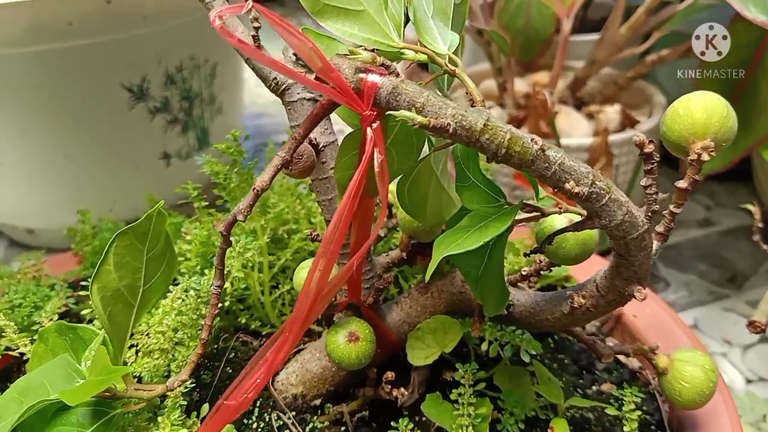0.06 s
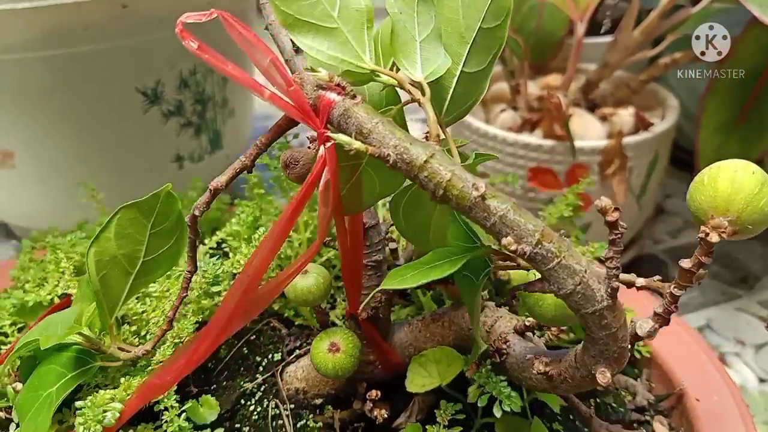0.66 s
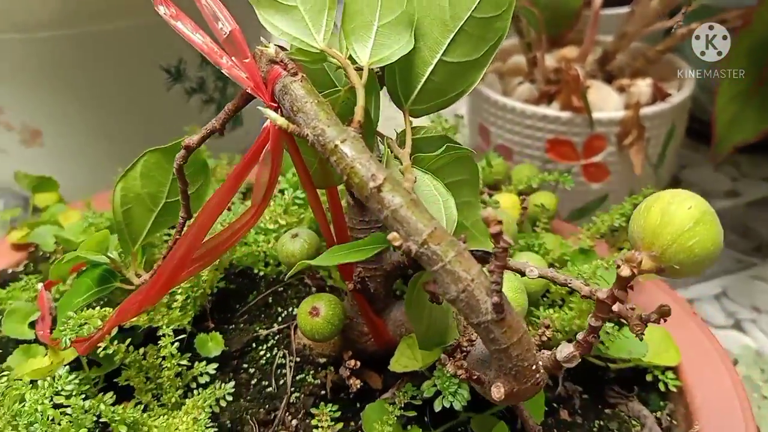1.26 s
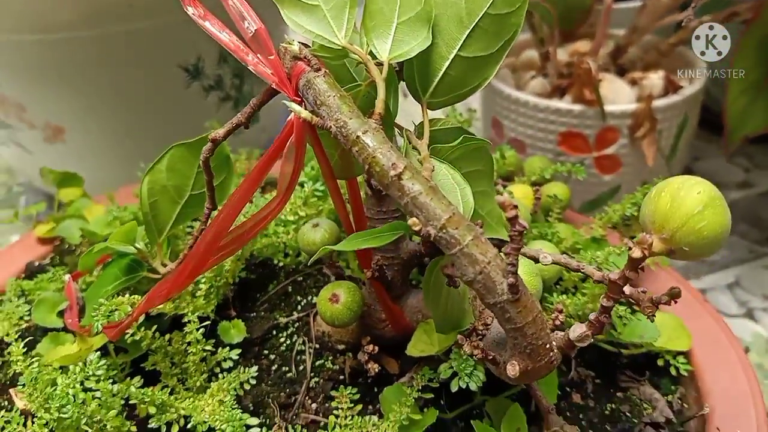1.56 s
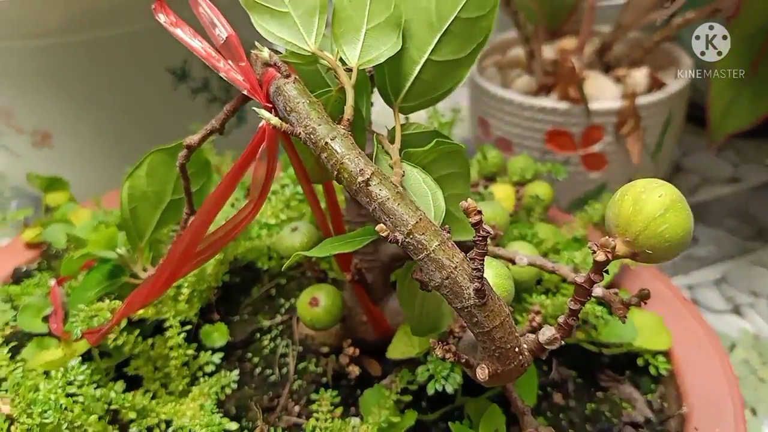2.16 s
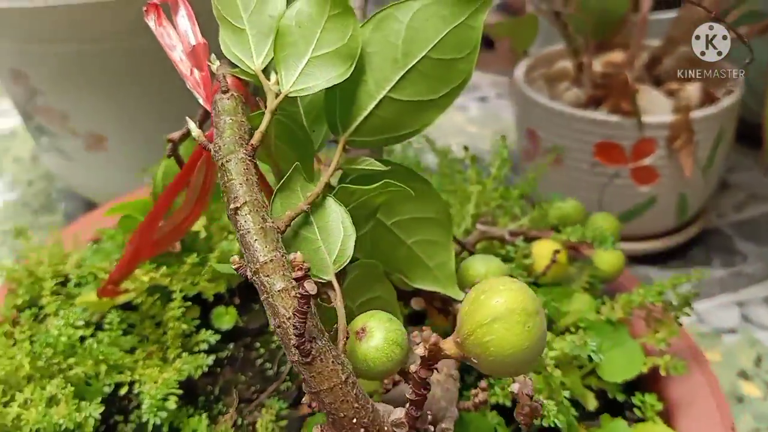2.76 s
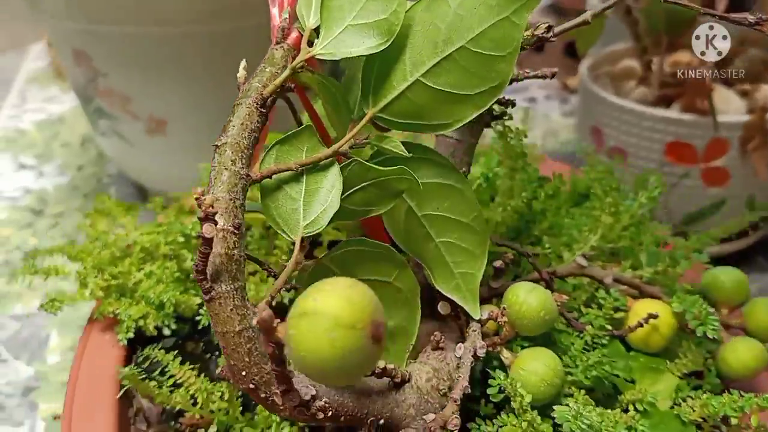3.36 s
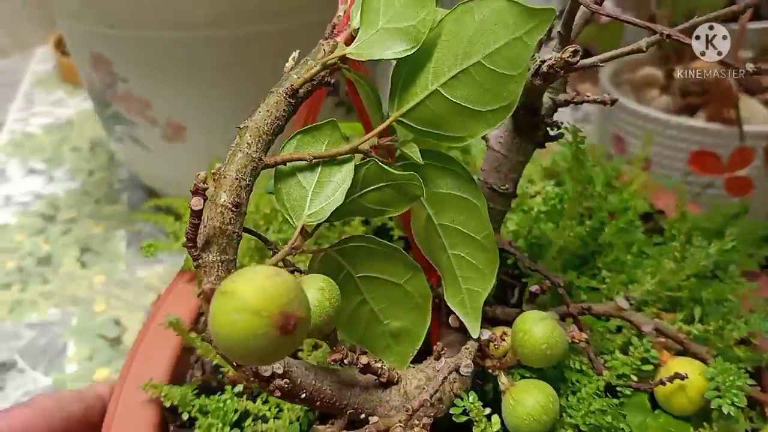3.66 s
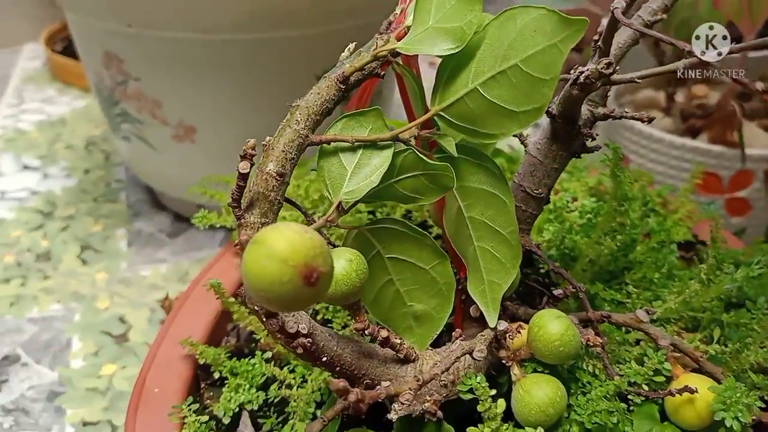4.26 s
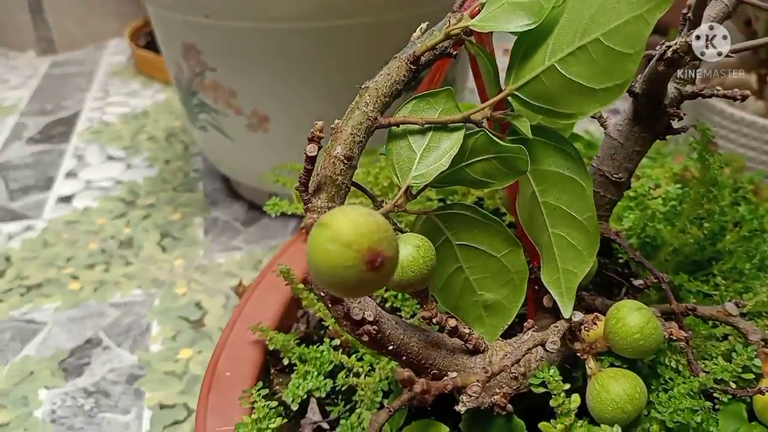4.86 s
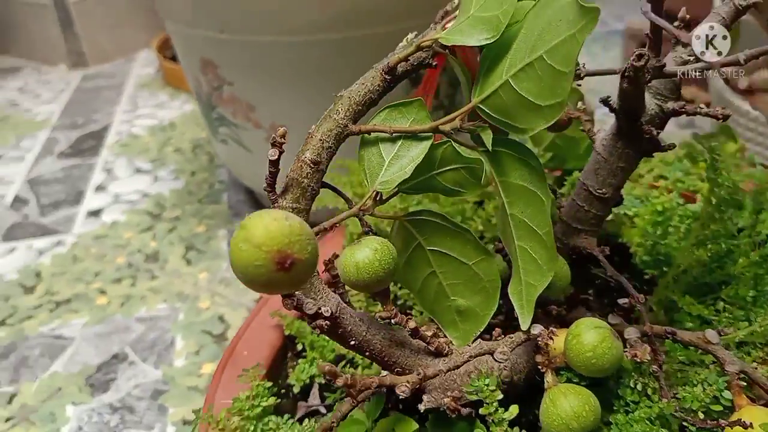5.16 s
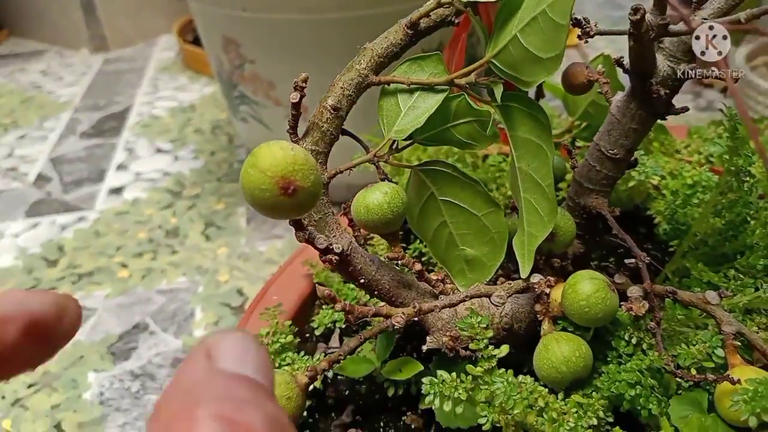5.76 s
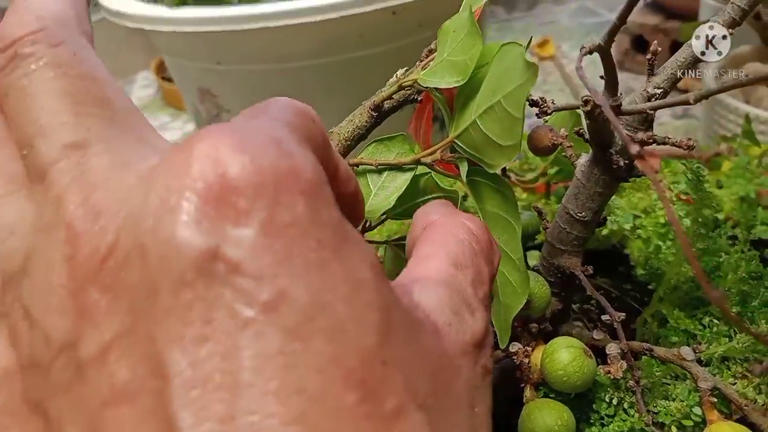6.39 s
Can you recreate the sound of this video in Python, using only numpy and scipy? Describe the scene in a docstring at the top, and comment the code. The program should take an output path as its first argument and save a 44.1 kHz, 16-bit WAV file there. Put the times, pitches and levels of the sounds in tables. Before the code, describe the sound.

Close, gritty scraping of a plant pot turned in several pushes, juddering into tiny squeaks and knocking lightly over a quiet background.

```python
"""A plastic pot with a small fig tree is turned on a table in a few pushes, close to a phone.
First its base hisses over fine grit and single grains crack; at 2 s the pot rocks and knocks.
From 2.5 s trapped grains judder into short rough squeaks that dip in pitch and recover.
From 4 s a dove coos far off and the pot knocks again; a last push squeaks at 5.3 s.
At 6.4 s a hand takes hold of a branch and jolts the pot. A quiet background murmurs throughout."""
import sys
import numpy as np
from scipy import signal
from scipy.fft import rfft, irfft, next_fast_len
from scipy.io import wavfile

SR = 44100
rng = np.random.default_rng(int(sys.argv[2]) if len(sys.argv) > 2 else 0)


def to_wav(s):
    """Save 16-bit WAV."""
    ch = np.atleast_2d(s).T  # columns
    pcm = np.round(np.clip(ch, -1, 1) * 32767)  # PCM
    wavfile.write(sys.argv[1], SR, pcm.astype(np.int16))


N = 287990
TIME = np.arange(N) / SR
TOP_HZ = 15600

# wall response to fine scraping: f/Hz, gain/dB
SCRAPE_EQ = [(500, -20.5), (1100, -12), (1500, -3), (1900, 3.5), (2200, 2), (2550, 1), (3300, -9.5),
             (4400, -8.5), (5500, -3.5), (6500, -11.5), (8500, -29.5), (15000, -34)]
# grains catching under the rim: t/s, length/s, pitch at bottom of dip/Hz, relative level/dB
CATCHES = [(2.5352, 0.0092, 1183, -28.5), (2.561, 0.01, 2205, -29), (2.572, 0.0071, 2173, -30),
           (2.592, 0.0052, 2455, -39), (2.63, 0.0064, 2270, -27.5), (2.6446, 0.0072, 2800, -30.5),
           (2.6768, 0.0053, 2315, -27.5), (2.695, 0.011, 2710, -33.5), (2.705, 0.007, 1335, -31.5),
           (2.7145, 0.011, 1735, -27.5), (2.727, 0.005, 2140, -29), (2.734, 0.0089, 1742, -27.5),
           (2.743, 0.013, 1895, -32), (2.786, 0.0088, 2800, -30.5), (2.793, 0.012, 1900, -29.5),
           (2.808, 0.0066, 2480, -28), (2.816, 0.0089, 2105, -27), (2.829, .004, 2600, -29.5),
           (2.8385, .016, 1794, -27.5), (2.855, 0.0062, 1946, -28), (2.864, 0.0063, 2255, -27.5),
           (2.875, 0.0068, 2680, -29.5), (2.897, .0045, 2160, -26), (2.904, 0.004, 2620, -28.5),
           (2.9115, 0.0045, 2500, -28), (2.9177, 0.006, 2190, -26), (2.924, 0.011, 1714, -28.5),
           (2.9525, 0.0052, 1810, -31), (2.958, 0.0091, 2050, -28), (3.031, .012, 1192, -30),
           (3.0736, 0.0064, 2360, -30.5), (3.835, 0.0099, 993, -27.5), (3.846, 0.0077, 2575, -30.5),
           (3.8698, .008, 1197, -29.5), (3.875, 0.0093, 1986, -26.5), (3.882, 0.011, 2214, -31.5),
           (5.262, 0.023, 580, -23), (5.285, 0.012, 1658, -25), (5.298, 0.0096, 1393, -26.5),
           (5.307, 0.0073, 2275, -20.3), (5.312, 0.016, 1793, -22), (5.365, .012, 948, -26.5),
           (5.375, 0.0077, 1850, -23), (5.381, .008, 1197, -25.5), (5.387, 0.0046, 2250, -29.5)]


def undb(db):
    """Decibels to gain."""
    return 10 ** (np.asarray(db) / 20)


def unit(x):
    """Scale to rms 1."""
    return x / np.sqrt(np.mean(x ** 2) + 1e-20)


def along(points, hz):
    """Read (f/Hz, value) points on a log-frequency axis."""
    f, value = np.transpose(points)
    return np.interp(np.log(hz + 1e-3), np.log(f), value)


def colour(x, points):
    """Minimum-phase filter through (f/Hz, gain/dB) points."""
    size = next_fast_len(x.shape[-1] + 1024, real=True)
    size += size % 2
    cepstrum = irfft(np.log(undb(along(points, np.fft.rfftfreq(size, 1 / SR)))))
    cepstrum[1:size // 2] *= 2
    cepstrum[size // 2 + 1:] = 0
    return irfft(rfft(x, size) * np.exp(rfft(cepstrum)))[..., :x.shape[-1]]


def resonate(x, hz, width_hz):
    """One resonance, gain 1 at its centre."""
    return signal.lfilter(*signal.iirpeak(hz, hz / width_hz, fs=SR), x)


def walk(rate_hz, size=N):
    """Random line segments, rms near 1."""
    at = np.arange(size) * rate_hz / SR
    knots = rng.standard_normal(int(at[-1]) + 2)
    return np.interp(at, np.arange(len(knots)), knots) * np.sqrt(3 / 2)


def add(out, x, start_s):
    """Mix in a stereo sound."""
    i = max(int(start_s * SR), 0)
    out[:, i:i + x.shape[1]] += x[:, :max(N - i, 0)]


def spread(pair):
    """Two unrelated signals become left and right: alike in the bass, apart in the treble."""
    # likeness of the two microphone ports: f/Hz, coherence/1
    coherence = [(100, 0.94), (300, 0.78), (700, 0.77), (1400, 0.13), (3000, 0), (6000, 0)]
    alike = along(coherence, np.fft.rfftfreq(N, 1 / SR))
    mid, side = irfft(rfft(pair) * np.sqrt([1 + alike, 1 - alike]), N)
    return np.array([mid + side, mid - side]) / 2


def ports(pair):
    """Each microphone port hears its own colour; the left one faces the pot."""
    # port balance: f/Hz, left minus right/dB
    balance = [(400, 3), (700, 0), (1300, 5), (2400, 7), (3400, -2), (4400, -3.5), (5600, 3), (8000, 1.5),
               (13000, 7.5)]
    return np.array([colour(x, [(hz, sign * db / 2) for hz, db in balance])
                     for x, sign in zip(pair, (1, -1))])


def slide(dust_gain_db=6.5, flutter_db=1.0):
    """The base slides: grit and dust excite the wall, the pot's weight drags below them."""
    # heavy, soil-filled body: f/Hz, gain/dB
    drag_eq = [(150, -32.5), (380, -15.5), (500, -1.5), (650, 1), (800, 1), (1000, 3.5), (1400, -4.5),
               (2200, -33)]
    # finest dust: f/Hz, gain/dB
    dust_eq = [(3000, -39.5), (5500, 18.5), (7000, 9), (9500, 1), (11500, 3), (13500, 3), (15500, -4.5)]
    hiss_env, drag_env, dust_env = friction()
    grit = rim_resonance(wall_ring(colour(grains(rate_hz=2500, scatter_db=1.0), SCRAPE_EQ)))
    drag = wall_ring(colour(grains(rate_hz=1500, scatter_db=.5), drag_eq))
    dust = colour(grains(rate_hz=5000, scatter_db=1.5), dust_eq)
    rub = hiss_env * unit(ports(grit)) + drag_env * unit(ports(drag))
    rub += undb(dust_gain_db) * dust_env * unit(ports(dust))
    return rub * undb(flutter_db * walk(90))


def grains(rate_hz, scatter_db):
    """Dense tiny slips of uneven size over a smooth rub."""
    hits = rng.random(N) < rate_hz / SR
    slips = hits * undb(scatter_db * np.minimum(rng.exponential(size=N), 5))
    return spread(rng.standard_normal((2, N)) * (unit(slips) + 1))


def friction(loose_grit_db=-13, loose_dust_db=-29):
    """Hiss, drag and dust envelopes: pushes, brief swells and what the judders shake loose."""
    # turning pushes: t/s, length/s, rise/s, fall/s, hiss/dB, swell/dB,
    # drag re hiss/dB, dust re hiss/dB, creep/dB
    pushes = [(-0.05, 1.482, .04, 0.03, -51, 4, -7.5, -20.5, -32),
              (0.334, 0.76, 0.067, 0.12, -52.5, 3.5, -6, -19, -25),
              (1.137, 0.29, 0.092, 0.039, -51.5, 1.5, -5, -20.5, -36),
              (2.299, 0.86, 0.15, 0.078, -46, -0.5, -8, -21, -20.5),
              (3.063, 0.9, 0.094, 0.043, -46.5, 1, -11.5, -16, -24),
              (3.236, 0.7, 0.1, 0.045, -49, -3, -0.5, -29, -13.5),
              (3.864, 0.16, 0.023, 0.023, -41.5, 0.5, -12, -21.5, -19),
              (4.203, 0.39, 0.1, 0.16, -56.5, 8.5, -28, -18.5, -11),
              (5.025, 0.5, 0.071, 0.06, -51.5, 11, -11.5, -21, -10)]
    # brief swells, including short tails after squeaks: centre t/s, half width/s, hiss/dB, dust/dB
    swells = [(.125, 0.031, -53, -57), (.21, 0.062, -53.5, -75), (.53, 0.013, -47.5, -61),
              (.75, 0.034, -52, -73), (3.9, 0.0055, -43, -58), (3.957, 0.0032, -55, -52),
              (5.332, 0.0027, -39, -74)]
    power = np.zeros((3, N))
    for start_s, length_s, rise_s, fall_s, db, swell_db, drag_db, dust_db, creep_db in pushes:
        envelope = push(start_s, length_s, rise_s, fall_s, swell_db, creep_db)
        power += np.outer(undb([db, db + drag_db, db + dust_db]), envelope) ** 2
    hiss, drag, dust = np.sqrt(power)
    swell_hiss, swell_dust = sum(np.outer(undb(levels_db), np.exp(-((TIME - at_s) / width_s) ** 2 / 2))
                                 for at_s, width_s, *levels_db in swells)
    shake = shaken()
    hiss = np.hypot(hiss, undb(loose_grit_db) * shake + swell_hiss)
    dust = np.hypot(dust, undb(loose_dust_db) * shake + swell_dust)
    return hiss, drag, dust


def push(start_s, length_s, rise_s, fall_s, swell_db, creep_db, creep_s=.15):
    """One push rises, swells towards its middle and falls into a short creep."""
    age_s = TIME - start_s
    left_s = length_s - age_s
    creep = undb(creep_db) * np.exp(np.minimum(left_s, 0) / creep_s)
    arch = np.sin(np.pi * np.clip(age_s / length_s, 0, 1))
    return np.clip(age_s / rise_s, 0, 1) * np.clip(left_s / fall_s, creep, 1) * undb(swell_db * arch)


def shaken(settle_s=.043):
    """Each judder keeps the grit shaken up for a moment."""
    drive = sum(undb(db) * ((TIME >= start_s) & (TIME < start_s + length_s))
                for start_s, length_s, _, db in CATCHES)
    pole = np.exp(-1 / (settle_s * SR))
    return signal.lfilter([1 - pole], [1, -pole], drive)


def wall_ring(x):
    """Wall resonances lift narrow bands of the scraping."""
    # wall modes: f/Hz, width/Hz, gain/dB
    modes = [(640, 38, -2), (2030, 120, -11.5), (2360, 86, -7.5), (2750, 210, -5), (5300, 150, -18)]
    return x + sum(undb(db) * resonate(x, hz, width_hz) for hz, width_hz, db in modes)


def rim_resonance(x, width_hz=130):
    """A narrow resonance glides and swells as the contact moves round the pot."""
    # resonance path: t/s, f/Hz, gain/dB
    glide = [(0, 2370, 1), (.55, 2480, 0.5), (.8, 2360, -8.5), (1.05, 1890, -4.5), (1.36, 2000, -3),
             (1.43, 2050, -14), (2.399, 2280, -4), (3.5, 2140, -18.5), (3.9, 1980, -0.5), (4.0, 2440, 5),
             (4.4, 2150, -22), (5.15, 1920, -3), (5.45, 2200, 5)]
    at_s, hz, db = np.transpose(glide)
    carrier = np.exp(2j * np.pi * np.cumsum(np.interp(TIME, at_s, hz)) / SR)
    pole = np.exp(-np.pi * width_hz / SR)
    baseband = signal.lfilter([1 - pole], [1, -pole], x * carrier.conj())
    return x + 2 * np.real(carrier * baseband) * undb(np.interp(TIME, at_s, db))


def squeaks(gain_db=-2.5, ring_db=3, ring_width_hz=450, steady_s=.009):
    """Each catch sounds from its place on the rim, where the wall adds a thin high ring."""
    # travelling catch spot: t/s, left lead at 2 kHz/rad, left minus right/dB, unloaded slip rate/Hz,
    # upper range/dB, edge band/dB, ring/Hz
    spot = [(2.55, -0.89, 1, 3250, -3.5, -1, 5870), (3.05, -0.56, 1, 3090, -9.5, 3, 5960),
            (3.85, -1.02, 1, 2920, -9, 3.5, 5400), (5.3, 1.53, 3, 2500, -11.5, -9.5, 5580)]
    # squeak roughness: t/s, relative slip rate jitter/1, rasp/1
    roughness = [(2.55, .1, .5), (3.85, .11, .6), (5.3, .06, .36)]
    # band radiated unevenly round the rim: foot/Hz, centre/Hz, top/Hz
    edge_hz = (1980, 3000, 3850)
    out = np.zeros((2, N))
    spot_s, *spot_columns = np.transpose(spot)
    rough_s, *rough_columns = np.transpose(roughness)
    for start_s, length_s, low_hz, db in CATCHES:
        lead_rad, pan_db, free_hz, upper_db, edge_db, ring_hz = (
            np.interp(start_s, spot_s, column) for column in spot_columns)
        jitter, rasp = (np.interp(start_s, rough_s, column) for column in rough_columns)
        jitter *= min(length_s / steady_s, 1)  # short squeaks are steadier
        force = stick_slip(length_s, low_hz, free_hz, lead_rad, jitter, rasp)
        sound = colour(radiate(force, upper_db), list(zip(edge_hz, (0, edge_db, 0))))
        rung = sound + undb(ring_db) * resonate(sound, ring_hz, ring_width_hz)
        gains = undb(db + gain_db + pan_db * np.array([[.5], [-.5]]))
        add(out, gains * unit(rung) * np.std(sound), start_s)
    return out


def stick_slip(length_s, low_hz, free_hz, lead_rad, jitter, rasp, attack_s=.00039, release_s=.001998):
    """A grain loads up and lets go: the slip rate dips and recovers, with a rasp on every slip."""
    total_s = length_s + release_s / 2
    size = max(int(total_s * SR), 64)
    t = TIME[:size]
    load = np.sin(np.pi * ((np.arange(size) + .5) / size) ** .75)  # peaks early
    hz = free_hz * (low_hz / free_hz) ** (load ** .55) * np.exp(jitter * walk(1500, size))
    phase = 2 * np.pi * np.cumsum(hz) / SR
    k = np.arange(1, 13)[:, None]
    partials = undb(-6 * np.log2(k)) * (k * hz < TOP_HZ)
    # bending waves in the wall scatter the partials and reach the two ports out of step
    scatter_rad = 2 * np.pi * rng.random(k.shape)
    slips = np.array([np.sum(partials * np.sin(k * (phase - lag_rad * hz / 2000) + scatter_rad), axis=0)
                      for lag_rad in (0, lead_rad)])
    noise = rng.standard_normal((2, size)) * (1 + .31 * np.cos(phase))
    contact = np.clip(np.minimum(t / attack_s, (total_s - t) / release_s), 0, 1)
    swell = 1 + .45 * load ** 2
    return (unit(slips) + 2 * rasp * unit(noise)) * contact * swell * undb(.52 * walk(694, size))


def radiate(force, upper_db, split_hz=3180):
    """The wall radiates a judder; upper_db sets how bright the squeak sounds."""
    # wall response to a judder: f/Hz, gain/dB
    judder_eq = [(250, -38), (550, -17), (1000, -8.5), (1400, -8), (1900, 2.5), (2600, 5), (3100, -1),
                 (3700, -2.5), (4400, -2), (5300, 1.5), (6100, -4), (7000, -11), (9000, -22),
                 (12500, -16.5), (15500, -27)]
    sound = ports(colour(np.pad(force, ((0, 0), (0, 400))), judder_eq))
    lower, upper = (unit(signal.sosfiltfilt(signal.butter(4, split_hz, side, fs=SR, output="sos"), sound))
                    for side in ("low", "high"))
    return (lower + undb(upper_db) * upper) * np.sqrt(force.shape[1] / sound.shape[1])


def knocks(gain_db=.5):
    """The pot rocks and settles: its rim grinds down for milliseconds and rings the hollow body."""
    # landings: t/s, length/s, level/dB, tuning/1, boom/dB, edge/dB, upper/dB, top/dB, crack re ring/dB
    landings = [(1.968, .008, -53, .95, 3, 6, -8, -3, -14), (1.9765, .009, -44, .94, 3.5, 3, -12, -3, -17),
                (1.99, .0065, -52, .87, 4, 7, -10, -8, -18), (4.225, .008, -53, .86, 2, 5, -6, -6, -9),
                (4.247, .01, -54, .89, 2, 4, -2, 0, -9), (4.604, .004, -60, 1, 8, -6, -12, -8, -16),
                (4.6146, .0012, -41, .97, -9, -16, -20, 6, -13),
                (4.8245, .0048, -47, .97, 2, -8, -14, -10, -14),
                (4.8302, .0037, -42.5, .98, -2, -1, -4, -2, -8)]
    # hollow body modes: f/Hz, nominal width/Hz, level/dB
    modes = [(620, 140, -17), (1020, 110, 3), (1850, 180, 0), (2310, 190, 0), (2950, 110, -9),
             (4570, 180, -11), (5900, 400, -17), (7000, 250, -25)]
    # tone bands, f/Hz each: boom, middle, edge, upper, top
    bands_hz = (1050, 1860, 2590, 4400, 5800)
    out, t = np.zeros((2, N)), TIME[:2500]
    for start_s, length_s, db, tuning, boom_db, edge_db, upper_db, top_db, crack_db in landings:
        force = (rng.standard_normal(len(t)) + .5 * rng.standard_normal((2, len(t)))) * (t < length_s)
        tone = list(zip(bands_hz, (boom_db, 0, edge_db, upper_db, top_db)))
        body = np.zeros_like(force)
        for hz, width_hz, mode_db in modes:
            once = resonate(force, hz * tuning, 2 * width_hz)
            twice = resonate(once, hz * tuning, 2 * width_hz)  # keeps the valleys dark
            body += undb(mode_db + along(tone, hz)) * unit(twice)
        crack = undb(crack_db) * unit(ports(colour(force, SCRAPE_EQ)))
        knock = unit(unit(ports(body)) + crack)
        add(out, knock * np.sqrt(length_s / t[-1]) * undb(db + gain_db), start_s)
    return out


def ticks():
    """A grain cracking under the rim gives a brief burst in the wall, each with its own brightness."""
    # cracking grains: t/s, relative level/dB, decay/s, treble/dB
    cracks = [(.105, -38, .0036, 4), (.364, -37, .003, 8), (.531, -35, .003, 3), (.674, -38, .003, 0),
              (.755, -39, .003, 6), (1.0715, -26.5, .0028, 0), (1.25, -37, .003, 3), (1.423, -43, .002, 4),
              (1.5005, -42, .0028, 0), (1.5459, -48.5, .006, -2), (1.6686, -48.5, .0013, 12),
              (2.0124, -49, .005, 3), (2.306, -53, .002, 10), (2.3356, -38.5, .004, 0),
              (2.3655, -33.5, .0025, 6), (2.4015, -31.5, .0036, 1), (2.441, -31, .0025, 0),
              (2.495, -30, .0025, 0), (3.954, -33, .003, 14), (4.0183, -26, .002, 0),
              (4.8514, -52, .004, 12), (5.0315, -42.5, .0025, 1), (5.0419, -35.5, .0036, 3),
              (5.053, -39, .0025, 2), (5.0689, -34, .0036, 4), (5.3002, -15, .001, -1),
              (5.3128, -17.5, .0008, 3), (5.3862, -19.5, .001, 0), (5.4105, -25, .002, -3),
              (5.481, -33, .003, 1), (5.571, -47.5, .008, 16), (5.585, -47, .0025, -3)]
    # snap spectrum: f/Hz, gain/dB
    snap_eq = [(500, -14.5), (1100, 3), (1900, 7.5), (2500, 11), (3300, -13), (4400, -6), (5500, 2.5),
               (6500, -2.5), (8500, -26.5), (15000, -26.5)]
    out, t = np.zeros((2, N)), TIME[:1500]
    for start_s, db, decay_s, treble_db in cracks:
        fade = np.exp(-t / decay_s)
        snap = colour(rng.standard_normal((2, len(t))) * fade, snap_eq)
        burst = unit(ports(colour(snap, [(2600, 0), (4600, treble_db)])))
        add(out, burst * np.sqrt(np.mean(fade ** 2)) * undb(db) / 2, start_s)
    return out


def jolt(start_s=6.413, level_db=-52, attack_s=.0011, shudder_s=.2, scuff_db=8, scuff_s=.068):
    """The gripped tree shakes the soil-filled pot: a dull shudder and a short scuff of the base."""
    # shudder spectrum: f/Hz, gain/dB
    shudder_eq = [(70, -21), (130, -10), (195, 0), (250, -1), (320, -4), (500, -5), (750, -2), (1100, -12),
                  (4000, -56)]
    age_s = np.maximum(TIME - start_s, 0)
    shudder = unit(colour(spread(rng.standard_normal((2, N))), shudder_eq)) * np.exp(-age_s / shudder_s)
    scrape = colour(grains(rate_hz=4100, scatter_db=1.0), SCRAPE_EQ)
    dulled = colour(scrape, [(2400, 1.5), (5500, -8), (12000, -2.5)])
    scuff = undb(scuff_db) * unit(ports(dulled)) * np.exp(-age_s / scuff_s)
    return (shudder + scuff) * undb(level_db) * (1 - np.exp(-age_s / attack_s))


def room(x, t60_s=.33, gain_db=-12.5, first_echo_s=.0006):
    """Diffuse echoes of the table and nearby walls."""
    t = TIME[:SR // 2]
    tail = rng.standard_normal((2, len(t))) * undb(-60 * t / t60_s) * (t > first_echo_s)
    tail /= np.sqrt(np.sum(tail[0] ** 2))
    tail = colour(tail, [(300, 2), (2200, 3.5), (5500, 5.5), (12000, -17)])
    return x + undb(gain_db) * signal.fftconvolve(x, tail, axes=1)[:, :N]


def dove(waver=.0092):
    """Three soft, nearly pure coos from far away."""
    # coos: t/s, length/s, f/Hz, level/dB
    coos = [(3.99, .25, 603, -68), (4.19, .3, 563, -73.5), (4.55, .31, 566, -73.5)]
    out = np.zeros((2, N))
    for start_s, length_s, hz, db in coos:
        size = int(length_s * SR)
        phase = 2 * np.pi * np.cumsum(hz * (1 + waver * walk(26, size))) / SR
        coo = unit(np.sin(phase) * np.sin(np.pi * np.arange(size) / size)) * undb(db)
        add(out, np.array([coo, coo]), start_s)
    return out


def background(air_db=-63.5, fade_db=-4):
    """Soft wavering noise and a few low drones; both slowly ease."""
    # noise spectrum: f/Hz, gain/dB
    air_eq = [(20, -34.5), (35, -27), (50, -30.5), (100, -6), (200, -9), (280, -11.5), (420, -15),
              (650, -12.5), (1200, -22), (1900, -21), (2500, -21), (3400, -36), (5500, -30), (8500, -49),
              (15000, -46.5)]
    # room drones: f/Hz, width/Hz, level/dB
    drones = [(61.6, 6.4, -76), (124, 24, -77.5), (151.6, 12, -75), (185.8, 7, -69)]
    murmur = unit(colour(spread(rng.standard_normal((2, N))), air_eq)) * undb(air_db + .8 * walk(4))
    for hz, width_hz, db in drones:
        wander = walk(2 * width_hz) + 1j * walk(2 * width_hz)
        murmur += undb(db) * unit(np.real(wander * np.exp(2j * np.pi * hz * TIME)))
    return murmur * undb(fade_db * (TIME / TIME[-1] - .5))


def scene():
    """The turning pot in its surroundings."""
    return room(slide() + squeaks() + knocks() + ticks() + jolt()) + background() + dove()


def record(dry):
    """The phone cuts the top treble."""
    return signal.sosfilt(signal.ellip(10, .2, 70, TOP_HZ, fs=SR, output="sos"), dry)


dry = scene()
out = record(dry)
to_wav(out)
```